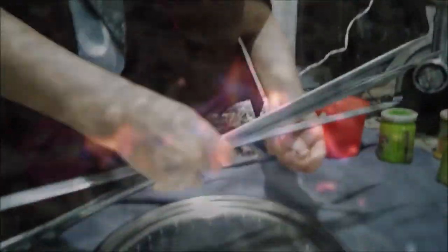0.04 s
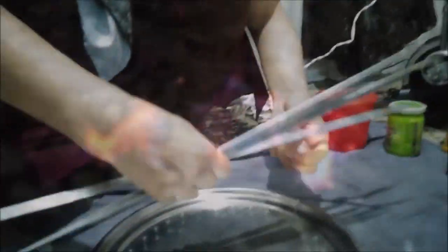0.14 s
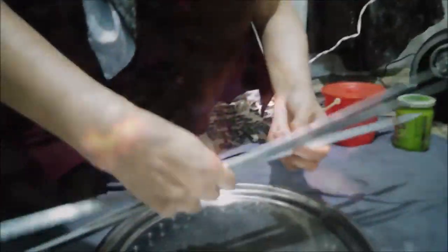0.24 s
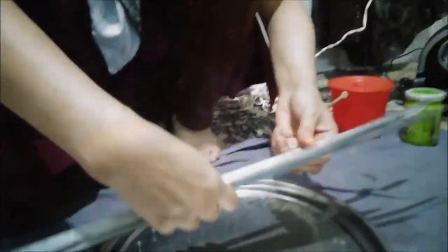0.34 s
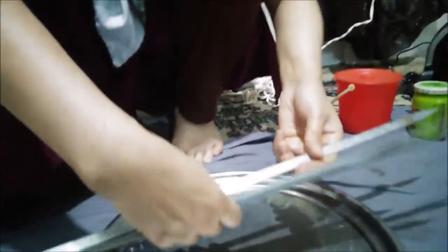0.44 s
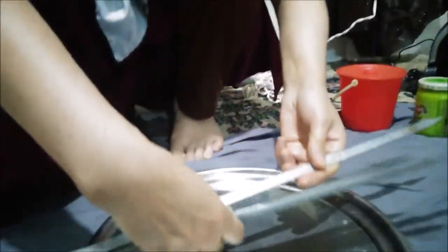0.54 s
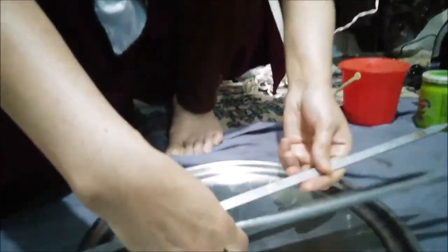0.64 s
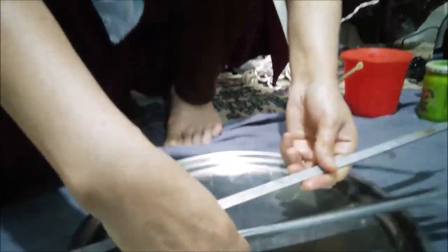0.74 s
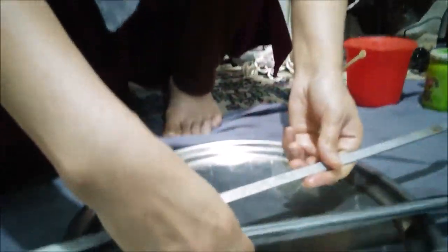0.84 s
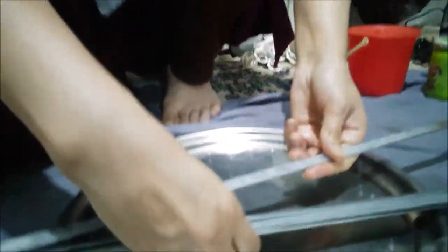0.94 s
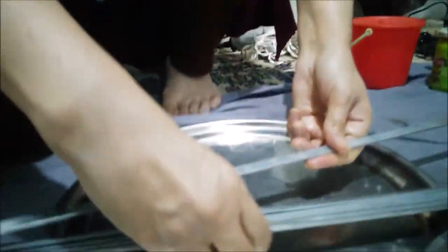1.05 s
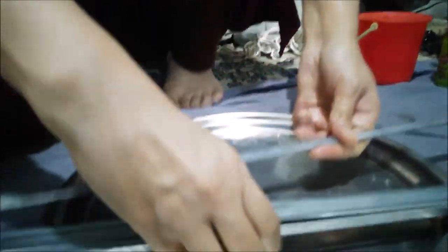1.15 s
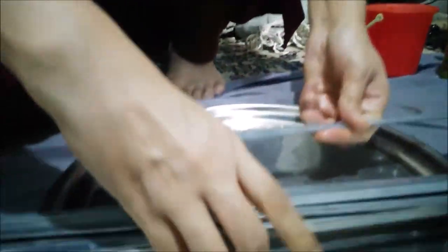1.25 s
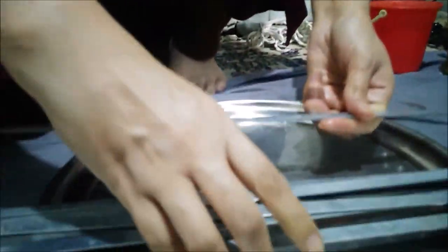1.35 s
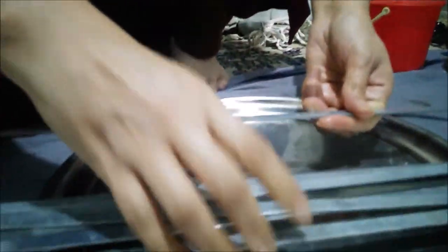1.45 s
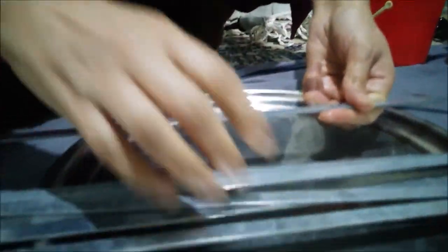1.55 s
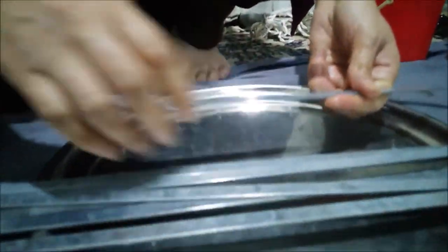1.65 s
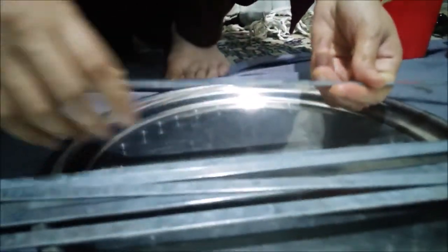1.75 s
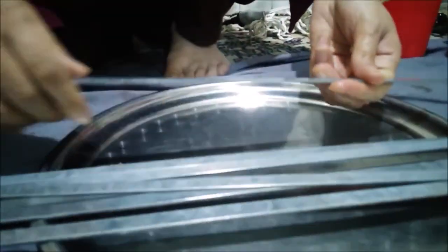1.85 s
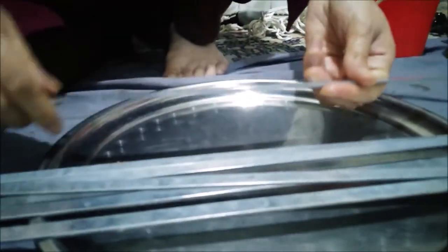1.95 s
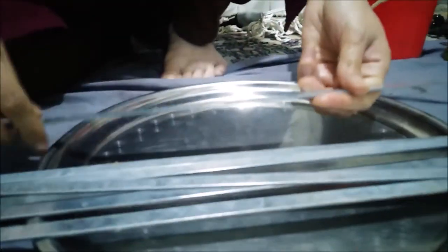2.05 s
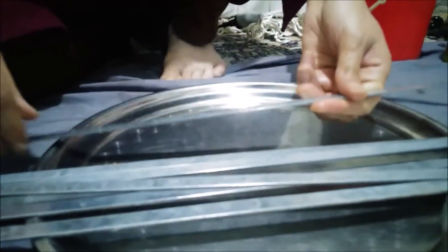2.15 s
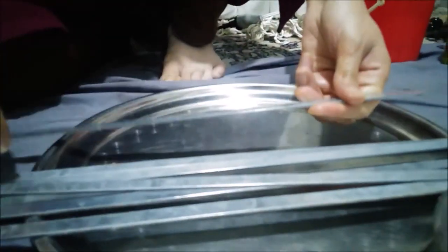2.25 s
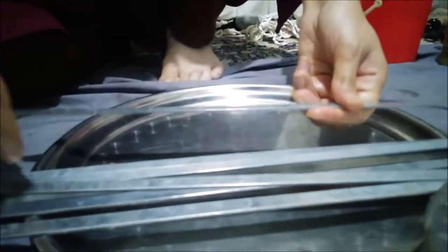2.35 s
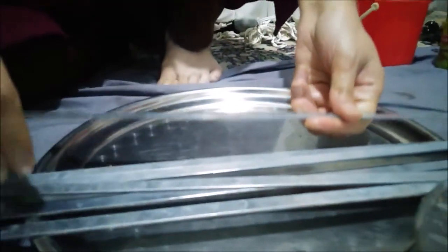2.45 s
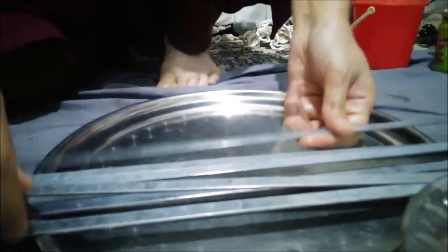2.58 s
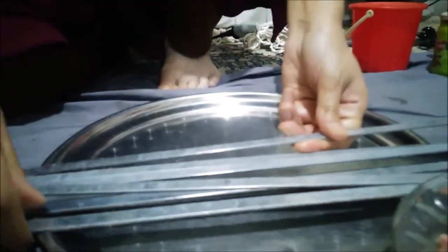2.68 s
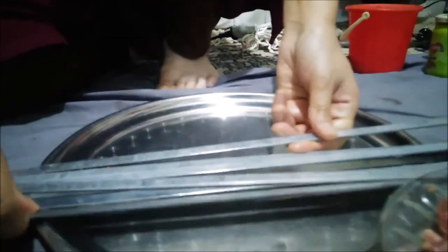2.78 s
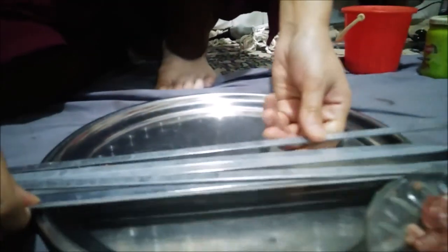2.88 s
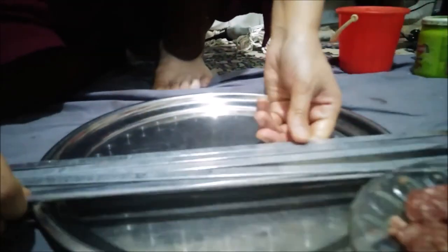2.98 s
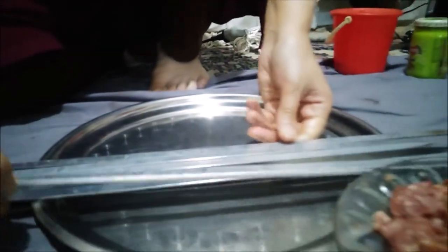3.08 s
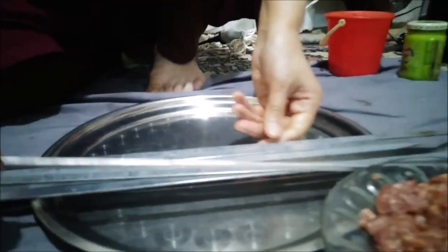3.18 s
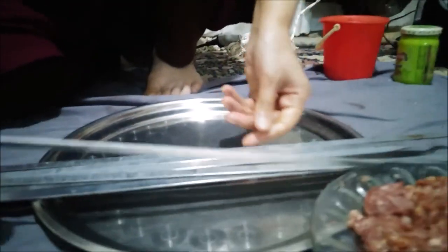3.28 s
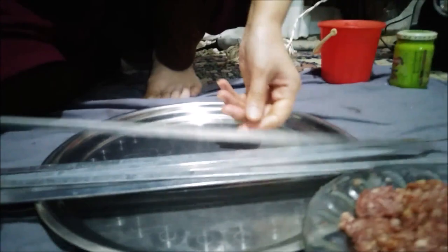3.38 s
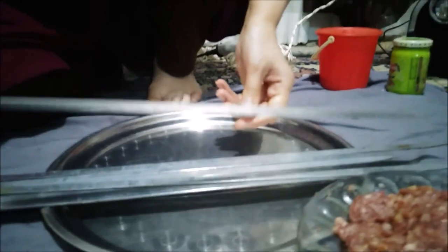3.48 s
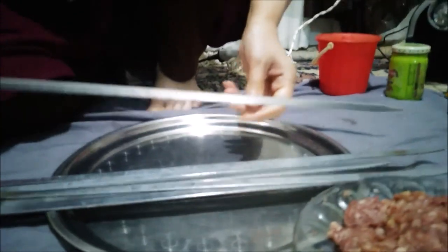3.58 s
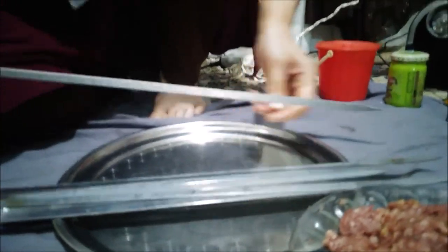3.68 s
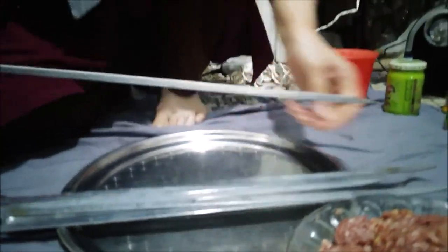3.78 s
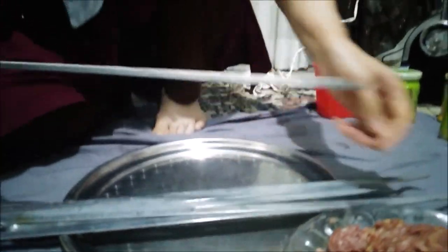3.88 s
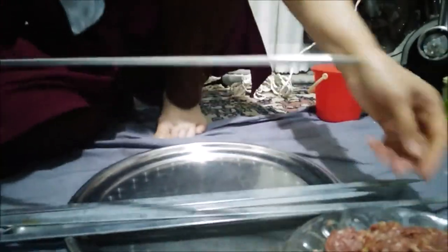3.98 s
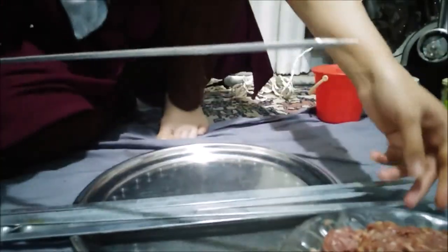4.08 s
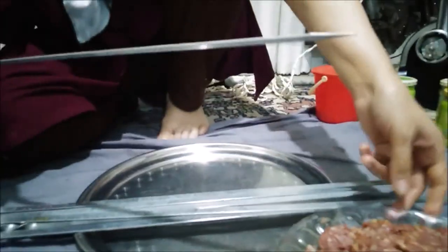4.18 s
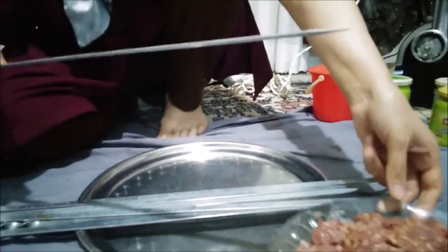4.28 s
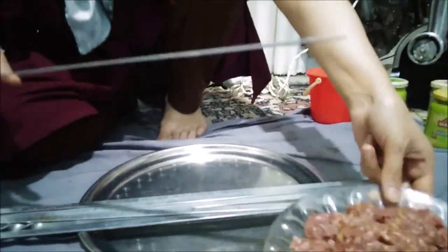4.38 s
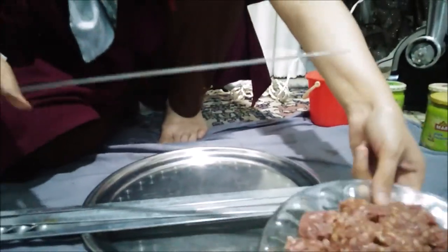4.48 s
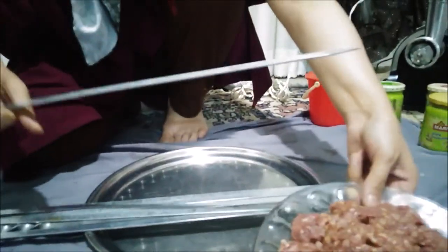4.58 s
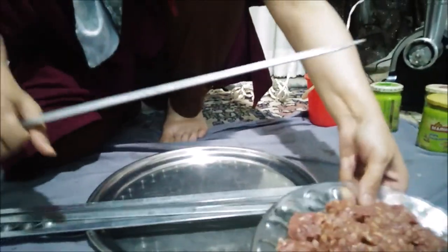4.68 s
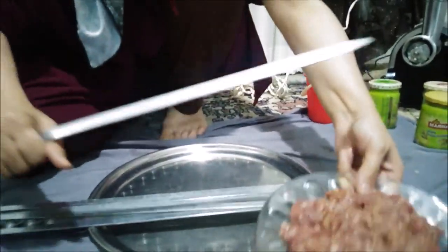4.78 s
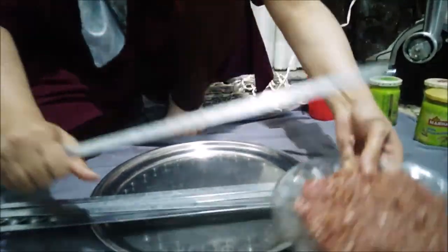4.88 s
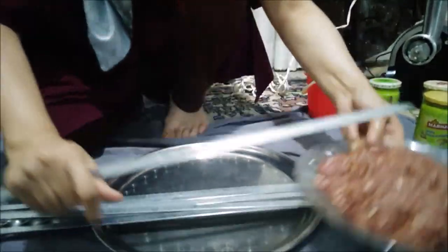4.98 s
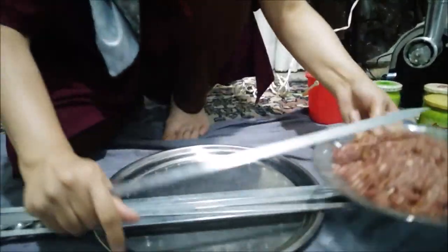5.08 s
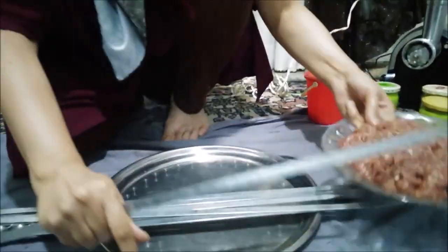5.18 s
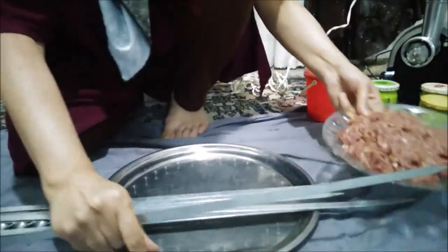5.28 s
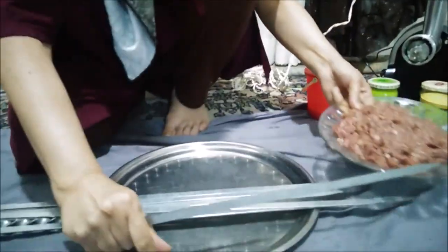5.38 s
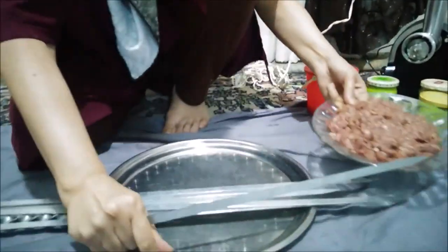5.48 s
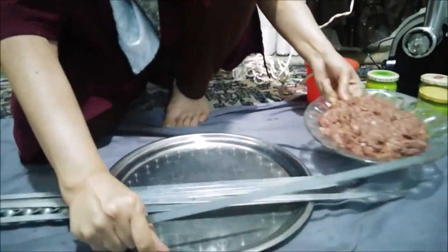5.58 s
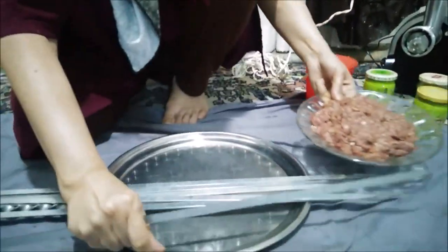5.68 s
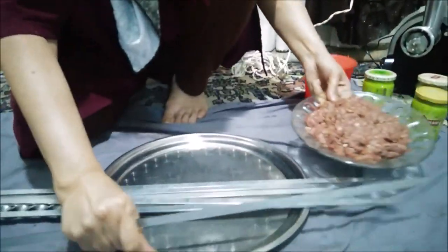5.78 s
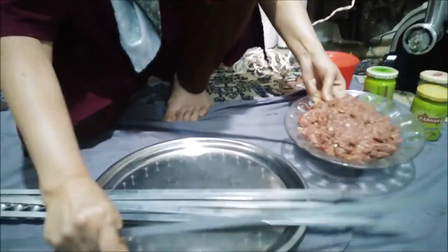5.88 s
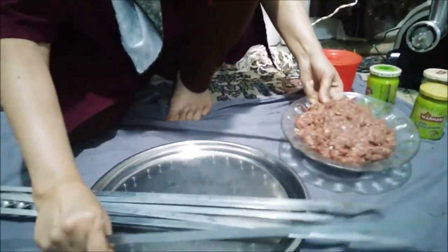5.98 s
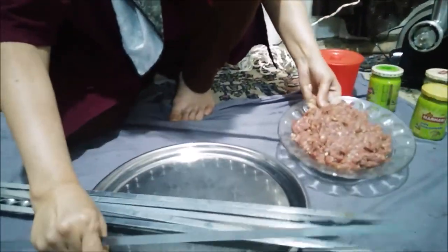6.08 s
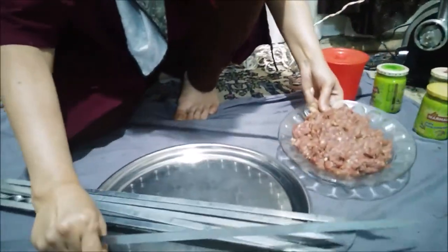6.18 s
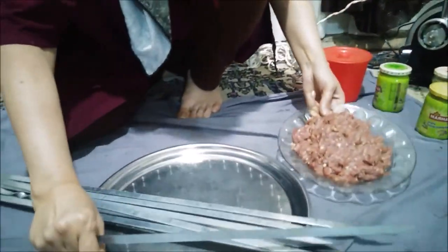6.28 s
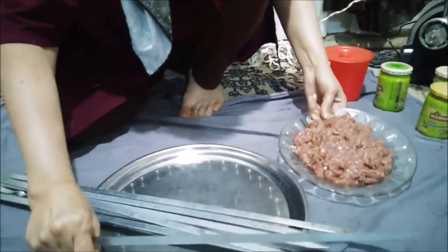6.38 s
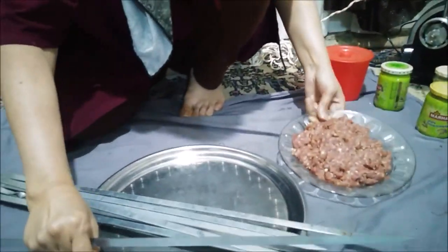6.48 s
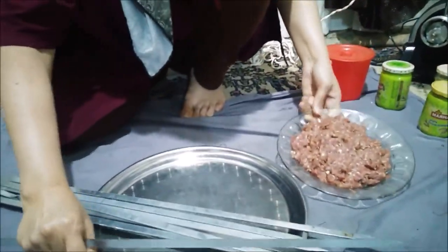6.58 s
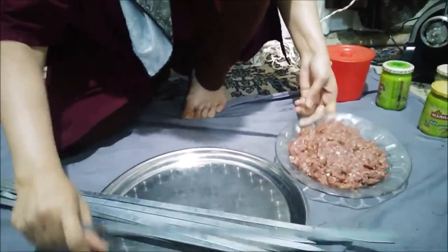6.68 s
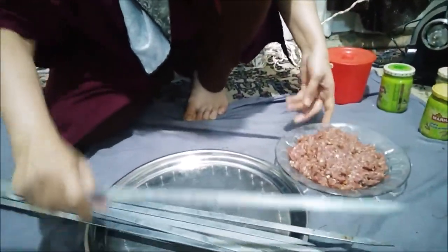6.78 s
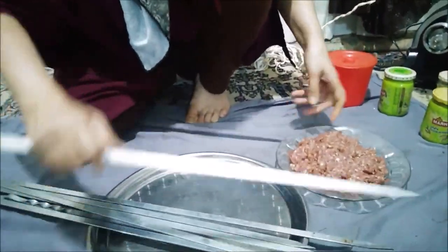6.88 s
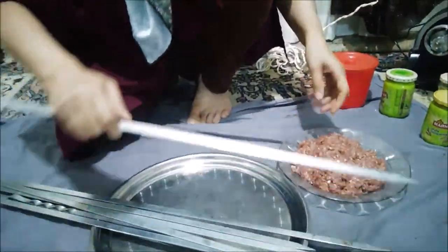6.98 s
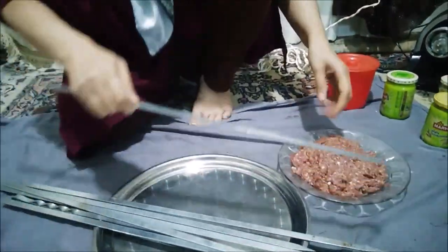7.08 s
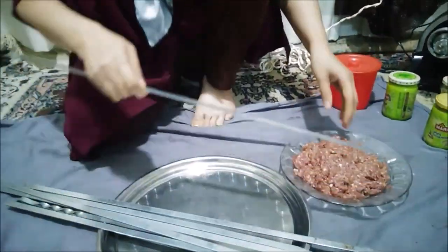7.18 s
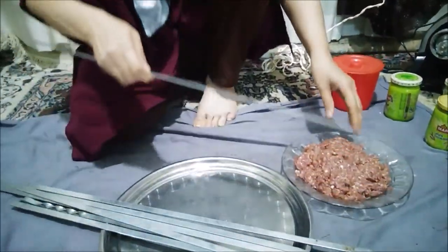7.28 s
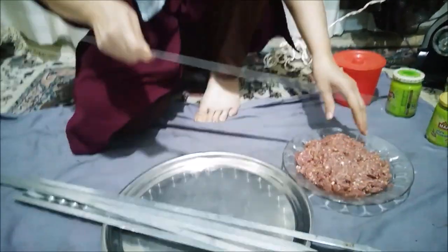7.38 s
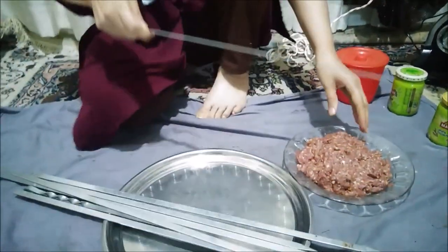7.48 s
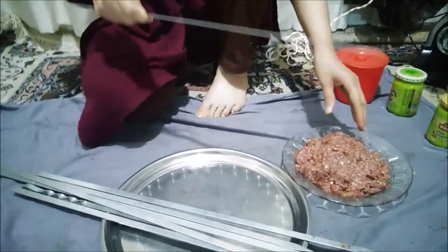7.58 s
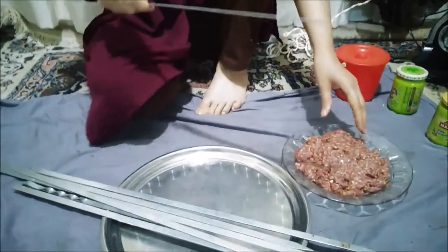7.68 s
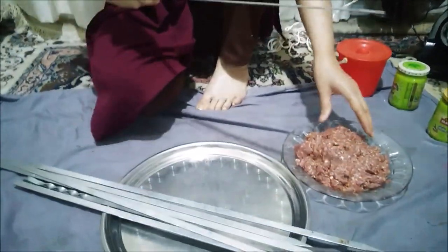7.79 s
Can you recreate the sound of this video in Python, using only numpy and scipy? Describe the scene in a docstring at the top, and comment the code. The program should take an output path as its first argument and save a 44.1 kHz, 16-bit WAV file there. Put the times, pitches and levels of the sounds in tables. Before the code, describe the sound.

A close, slightly compressed phone pickup in a small, soft room, with a low mains hum, wavering drone, rumble, faint whirring and thin hiss underneath. From 0.2 to 0.8 seconds, steel skewers give small, bright, short taps. At 0.85 they begin knocking harder, and from about 1.25 to 1.7 they clash and rattle loudly, a dense, jangling metallic scrape that thins away by 2.2. At 2.7 another sharp clash starts a run of knocks and slides, lasting until about 3.6. Then it is nearly quiet, with a faint tink near 4, light touches at 4.4 and a clearer tink at 4.85. At 5.36 a glass bowl lands with a hard, bright clink and a quick second knock, then softer chatter around 5.6. Muted steel taps and slight scrapes occur from 6.2 to 6.9. One dry snap, mostly left, comes at 7.2, before the low background closes the scene.

```python
"""Close up on a phone: a mains hum, a wavering drone, rumble, faint whirring bands and hiss lie under it all.
Long flat steel skewers tap softly, then from 0.85 s are knocked, rattled and slid on a steel tray: damped sines.
Past 3.6 s they quieten, with two faint tinks; from 5.4 s a glass bowl is set down with a few clinks, then softer
knocks follow, and at 7.2 s one dry snap, mostly on the left. A small soft room, made of decaying noise, answers."""
import sys
import numpy as np
from scipy import signal
from scipy.fft import rfft, irfft, next_fast_len
from scipy.io import wavfile
from scipy.ndimage import uniform_filter1d

SR = 44100
rng = np.random.default_rng(int(sys.argv[2]) if len(sys.argv) > 2 else 0)


def write(x):
    x = np.atleast_2d(x).T
    wavfile.write(sys.argv[1], SR, np.round(np.clip(x, -1, 1) * 32767).astype(np.int16))


N = 345786

# All levels are set at the microphone, ahead of its noise suppressor and limiter.
# The air of the place. Each row: time in seconds, drone level in dB, rumble level in dB.
AIR_LEVELS = [(0.0, -61, -59.5), (0.24, -61, -57), (0.61, -69.5, -60), (0.89, -57, -50.5),
              (1.18, -56, -53.5), (1.24, -60, -39.5), (2.01, -58, -55), (2.66, -55.5, -53.5),
              (2.68, -58, -43), (3.34, -64, -52), (3.41, -51.5, -48.5), (3.82, -59, -56),
              (4.08, -50, -55.5), (4.82, -60, -61.5), (5.43, -47.5, -60), (5.65, -58.5, -63),
              (7.6, -70, -59), (7.84, -75, -55.5)]
# Level of the whirring bands. Each row: time in seconds, level in dB.
WHIRR_LEVELS = [(0, -71), (.4, -66), (.8, -66.5), (1.85, -70.5), (2.2, -67), (2.5, -78), (3.9, -71),
                (4.3, -65.5), (4.65, -70), (5.2, -65.5), (6.2, -62.5), (7.0, -71), (7.45, -70), (7.84, -64)]
# Thin hiss. Each row: frequency in Hz, relative density in dB per Hz.
HISS_DENSITY = [(450, -4), (700, -10.5), (1000, -12.5), (1700, -13), (2500, -12), (4000, -14.5),
                (7000, -10), (10000, -18), (13500, -17.5)]
# Noise resonances: rumble, whirr, and the lowest boom. Each row: centre in Hz, width in Hz, relative level in dB.
RUMBLE_BANDS = [(187.4, 62, 3.5), (260, 69, -5), (340.2, 92, -3), (467.5, 330, -23)]
WHIRR_BANDS = [(600, 140, -6.5), (1230, 130, -5.5), (1455.6, 130, 2.5), (1900, 80, -13)]
BOOM_BANDS = [(35, 32, -11.5), (81, 30, 2)]
# Decay of the small room. Each row: frequency in Hz, time to fall 60 dB in seconds.
ROOM_DECAY = [(300, 0.83), (2000, 0.47), (7000, 0.35), (14000, 0.2)]
# Balance of the two microphone ports. Each row: frequency in Hz, left minus right in dB.
PORT_BALANCE = [(60, 2.5), (110, 2.0), (200, 1.5), (380, 2.5), (700, -1.5), (1290, 7.5), (2380, -5.5),
                (4400, -4.5), (8120, 3.5), (15000, 4.5)]
# Faint tinks of a free skewer. Each row: start in seconds, level in dB, pitch factor, left minus right in dB.
TINK_EVENTS = [(3.96, -68.5, 0.87, 1.5), (4.854, -54.5, 0.98, -2.5)]
# Modes of the free skewer. Each row: frequency in Hz before the pitch factor, relative level in dB,
# time to fall 60 dB in seconds before damping.
TINK_MODES = [(2100, -7, 0.1), (3366, -11, 0.057), (4270, 1.5, 0.071), (5520, 2, 0.092),
              (6650, -0.5, 0.094), (7980, -5, 0.072)]
# Bowl clinks. Each row: start in seconds, level in dB, left minus right in dB, damping time to fall 60 dB in
# seconds, brightness in dB per octave, crack level in dB relative to the ring.
CLINK_EVENTS = [(5.359, -6.5, -2, 0.073, -2.5, -8), (5.434, -17.5, 1.5, 0.053, -2.5, 1.5),
                (5.581, -35, -1, 0.2, 8, -22), (5.6, -34, -7, 0.17, 3, -21),
                (5.618, -31.5, 6, 0.14, -1, -12), (5.652, -28.5, 1, 0.12, 0, -13),
                (5.666, -29, 15, 0.051, 1.5, -24), (5.677, -24.5, -4, 0.095, 3, -14)]
# Modes of the glass bowl. Each row: frequency in Hz, relative level in dB, time to fall 60 dB in seconds
# before damping.
BOWL_MODES = [(614, -2, 0.25), (694, -12, 0.1), (783, -22, 0.1), (934, -13, 0.054), (1120, -17, .05),
              (1406, -1.5, 0.029), (1890, -16, .05), (2344, -1, 0.045), (2510, 0.5, 0.069),
              (3424, -5, 0.065), (4370, -6, 0.063), (4580, -1, 0.055), (4880, -13.5, 0.054),
              (5400, -1.5, 0.092), (5850, 1, 0.049), (6370, -4.5, .07), (6683, 8, 0.053), (6950, -5, 0.074),
              (7850, -15.5, .08), (7980, -6.5, 0.26), (9000, -35, .06)]
# Rebounds of the bowl. Each row: typical gap after the knock in seconds, relative level in dB.
BOWL_REBOUNDS = [(.004, -4), (.016, -13), (.03, -19)]
# Strongest modes of the steel strips. Each row: frequency in Hz, relative level in dB, time to fall 60 dB in
# seconds before damping.
STRONG_MODES = [(1540, -23, 1.1), (1620, -5.5, .6), (1866, -1.5, 1.8), (1910, -5, 3), (3420, -27, 0.33),
                (3670, -4.5, 0.41), (4320, -14, 0.2), (5040, -30.5, 0.23), (5920, -1, 0.31),
                (5930, 0.5, 0.27), (5870, -1.5, 0.2), (6280, -10.5, 0.52), (7740, -8, 0.42),
                (6145, 2.5, 1.1), (7120, -6.5, 1.1), (6700, 5, 0.35), (7675, -9, 0.35), (7370, -16, 0.48),
                (7750, -17.5, 1.1), (6670, -14.5, 0.33), (8170, -1.5, 0.43), (9450, -17.5, 0.64),
                (9119, -21, 0.62), (8720, -9.5, 0.17), (9663, -20.5, 0.33), (10700, -21.5, 0.34),
                (11160, -27, 0.55), (11700, -24, 0.35)]
# Loudness contour of the dense strip modes. Each row: frequency in Hz, relative level in dB.
DENSE_CONTOUR = [(150, -56), (400, -28), (620, -18), (1030, -22), (1650, -3.5), (1890, -3.5), (2800, -14),
                 (3620, -5), (4010, -16.5), (5000, -13.5), (6900, -3.5), (9220, -11.5), (10400, -19),
                 (13600, -21), (14600, -33)]
# Slides and rattles. Each row: loudest from in seconds, rise, hold and fall in seconds, edge level in dB,
# bending level in dB relative to edge, tray level in dB relative to edge, left minus right in dB.
SLIDE_EVENTS = [(0.0, 0.009, .02, 0.63, -74.5, -19, 9, -7), (0.341, 0.23, .01, 0.25, -54, -16, -23, 0),
                (0.48, 0.12, .01, 0.15, -51.5, -14, -23.5, 1),
                (0.76, 0.14, 0.11, 0.067, -59.5, -24, -27, -11),
                (0.989, .012, .11, .3, -29, -2.5, -20.5, 0.64),
                (1.23, .12, 0.0058, 0.038, -21, -2, -12, -1),
                (1.293, 0.081, 0.094, 0.33, -11.5, -8, -24.5, -1),
                (1.386, .15, 0.055, 0.22, -13, -3.5, -17, -2), (1.531, .08, .06, .15, -23.5, -5, -21, -0.5),
                (1.9, 0.56, .01, .4, -64, -22, -12.5, .5), (2.089, .2, 0.011, 0.47, -74, 8.5, -16, -5),
                (2.773, .01, 0.085, 0.17, -23, -6, -16, -0.5),
                (2.96, .05, 0.071, .05, -28, -1.5, -15, -0.5),
                (3.038, .01, 0.038, 0.2, -19, -4.5, -18.5, -1),
                (3.137, .1, 0.044, 0.066, -34, -2.5, -14.5, 1),
                (3.342, 0.0064, 0.052, .1, -33.5, -0.5, -10, 2),
                (3.395, 0.043, 0.02, 0.14, -20, -8, -17.5, 1.5), (3.54, 0.3, 0.02, 0.23, -39.5, 2.3, -6, 0),
                (3.953, .02, 0.014, 0.16, -75.5, 12.5, -10, 4.5),
                (4.305, 0.14, 0.084, .03, -69.5, 0, -9, -1), (4.411, .01, 0.012, 0.056, -58, 16, 3.5, 3),
                (5.404, 0.19, .01, 0.33, -51.5, -18, -11, -1), (5.56, .06, 0.041, .3, -61.5, 3, -21, -2.5),
                (5.661, .2, 0.011, 0.1, -53, 6.5, -4.5, 7), (5.818, 0.074, 0.05, 0.21, -46, 5, -11, 3.5),
                (6.167, 0.078, 0.079, 0.46, -65.5, 12, -14.5, 8.5),
                (6.371, 0.19, 0.074, .2, -61.5, -3, -15, 3.5), (6.553, 0.19, 0.046, 0.086, -61, 8, -10, 7),
                (6.634, 0.12, 0.0089, 0.14, -45, -9, -14, 0), (6.8, 0.17, 0.0086, 0.16, -47.5, 0, -13, 2.5),
                (6.951, .1, 0.12, 0.36, -71, 3.5, -9.5, 5.5),
                (7.24, .03, 0.066, 0.19, -70.5, 1.5, -4.5, 9.5),
                (7.54, 0.37, 0.0094, .25, -63, -5.5, -2.5, -4.5), (7.5, .2, 0.22, .2, -85, 7, 15, 3.5)]
# The held bundle is never quite still: mean levels in dB of its edge, bending and tray modes.
FIDGET_LEVELS = (-77, -84, -85.5)
# Skewer knocks. Each row: start in seconds, edge level in dB, bending level in dB relative to edge,
# tray level in dB relative to edge, damping time to fall 60 dB in seconds, left minus right in dB.
KNOCK_EVENTS = [(0.2274, -33.5, -35, -33, 0.16, 9), (0.2644, -20, -17, -41, 0.045, 2.5),
                (0.317, -28.5, -26, -40, 0.073, 0), (0.4573, -25, -29, -80, 0.027, 0),
                (0.695, -45, -30, -38, 0.17, -7), (0.761, -44, -25, -27, 0.048, -1),
                (0.7884, -45, -29, -30, 0.062, 5), (0.852, -8.5, -5, -13, 0.1, 1.5),
                (0.9707, -16, 5.5, -8.5, 0.04, 5), (0.9833, -9.5, -4.5, -17.5, 0.093, 4),
                (1.0257, -13.5, -1.5, -8.5, 0.33, 0.5), (1.1578, -15.5, -4.5, -17.5, 0.21, 5),
                (1.2273, -12, -7.5, -29, 0.031, 11.5), (1.2583, 12, -5.5, -16, 0.042, -1),
                (1.5034, 8, -8.5, -31, 0.086, -1), (1.5999, -12, 1.5, -20, 0.092, -1.5),
                (1.6737, -24, -7, -17, 0.09, -5), (1.711, -22.5, -8, -18, 0.017, -8),
                (1.8125, -23, -3, -17, 0.092, -2), (1.909, -53, -5.5, -2, 0.12, -7.5),
                (1.9892, -33.5, 2, -22, 0.14, 1.5), (2.1312, -44, -3, -13, 0.28, -10),
                (2.163, -32.5, -1, -27, 0.15, 2), (2.6852, 4.5, -6.5, -19, 0.16, -2.5),
                (2.7278, -5, -9.5, -30, 1, 2.5), (2.7842, -3, -5.5, -19.5, 0.22, -3.5),
                (2.8176, -5, -8, -26, 0.19, 0.5), (2.9481, -21.5, 0.5, -11, 0.53, -1),
                (3.0328, -5.5, -0.5, -13, 0.038, -2.5), (3.0793, -10.5, -6, -32, 0.079, -3),
                (3.3327, -17, -7, -17, 0.4, -1.5), (3.4925, -10.5, -4.5, -17.5, 0.086, 2.5),
                (3.5569, -21.5, -8, -24, 0.11, 6), (4.4172, -30.5, -3.5, -21, 0.28, 5.5),
                (4.4692, -39, 2, -10.5, 0.26, 0), (5.8234, -47, 4, -7.5, 0.16, 9),
                (6.248, -22.5, -14, -42.5, 0.16, 2.5), (6.4333, -56, 8, -20.5, 0.13, 3.5),
                (6.5634, -45.5, 9, -14, 0.28, 1), (6.6008, -22, -6, -34, 0.17, 3),
                (6.6727, -35, 1.5, -20.5, 0.19, 4), (6.761, -41.5, 2.5, -29.5, 0.13, 18.5),
                (6.7792, -34.5, 0.5, -26, 0.089, -5), (6.8952, -39.5, -2, -33, 0.34, 4)]

HUM_HZ, HUM_DB, HUM_WAVER_DB, DRONE_HZ = 100.8, -56, 2.5, 144.5
HISS_DB, ROOM_DB = -72, -10
SNAP_S, SNAP_DB, SNAP_PAN_DB = 7.2065, -27.5, 17
TRAY_TOP_HZ, BENDING_TOP_HZ = 1200, 4000  # tray modes lie below, edge modes above
PORT_LAG_S = 0.00033
CLINK_SCATTER_DB = 2.5
CONTACTS_PER_S, TICK_WANDER_DB, TICK_TOP = 900, 2, 4  # the top caps rare strong contacts
SLIDE_FADE_DB, FIDGET_WANDER_DB = 30, 3  # the fade is gained per rise time and lost per fall time
GATE_DB, GATE_DEPTH_DB, LIMIT_DB = -86, -8, -10
MIC_TOP_HZ, TOP_HZ = 14300, 15600
LEFT_RIGHT = np.array([[1], [-1]])


def undb(db):
    """dB to gain."""
    return 10 ** (np.asarray(db) / 20)


def unit(x):
    """Scale to rms 1."""
    return x / np.sqrt(np.mean(x ** 2) + 1e-30)


def on_log(table, hz):
    """Read a table of frequency and value on a log-frequency axis."""
    f, v = np.transpose(table)
    return np.interp(np.log(np.maximum(hz, 1)), np.log(np.maximum(f, 1)), v)


def curves(table):
    """Columns of a time table, one value a sample."""
    s, *columns = np.transpose(table)
    return [np.interp(np.arange(N) / SR, s, c) for c in columns]


def walk(rate):
    """Random levels held for 1 / rate seconds and smoothed twice, scaled to rms 1."""
    hold = int(SR / rate)
    steps = np.repeat(rng.standard_normal(N // hold + 1), hold)
    return unit(uniform_filter1d(uniform_filter1d(steps, hold), hold)[:N])


def decay(t, t60):
    """Exponential fall of 60 dB in t60 seconds."""
    return np.exp(-np.log(1000) * t / t60)


def mode_gain(db):
    """Mode levels in dB as a column of gains."""
    return undb(db)[:, None].astype(np.float32)


def bands(modes, alike, flicker_db):
    """Noise in resonances that each flicker; partly alike left and right."""
    size = next_fast_len(N, True)
    f = np.arange(size // 2 + 1) * SR / size
    out = 0
    for hz, width, db in modes:
        shape = 1 / (1 + ((f - hz) / (width / 2)) ** 4)
        mid, side = (unit(irfft(rfft(rng.standard_normal(size)) * shape, size)[:N]) for _ in range(2))
        pair = np.sqrt((1 + alike) / 2) * mid + np.sqrt((1 - alike) / 2) * side * LEFT_RIGHT
        out = out + undb(db + flicker_db * walk(13)) * pair
    return unit(out)


def rings(hz, t60, spread):
    """Damped sines at both ports: long waves reach the left port later, and each mode radiates its own way."""
    t = np.arange(SR // 3) / SR
    lag = np.where(hz < BENDING_TOP_HZ, 2 * np.pi * hz * PORT_LAG_S, 0)
    lag = lag + spread * rng.standard_normal(len(hz))  # radians
    pole = 2j * np.pi * hz - np.log(1000) / t60
    wave = np.exp(np.outer(pole, t).astype(np.complex64))
    side = undb(on_log(PORT_BALANCE, hz) / 2)
    port_gains = (side * np.exp(-1j * lag), 1 / side)
    return np.array([(wave * g[:, None].astype(np.complex64)).imag for g in port_gains])


def strike(ring, t60, scatter_db, rise_s):
    """A new contact point weights the modes afresh; added damping shortens the ring."""
    chance = rng.standard_normal((2, ring.shape[1]))
    t = np.arange(ring.shape[2]) / SR
    weights = (np.sign(chance[0]) * undb(scatter_db * chance[1])).astype(np.float32)
    return weights @ ring * decay(t, max(t60, .01)) * (1 - np.exp(-t / rise_s))


def add(out, sound, s, db, pan_db):
    """Place a sound at s seconds with its peak at db before panning."""
    i = int(s * SR)
    n = min(sound.shape[1], N - i)
    out[:, i:i + n] += sound[:, :n] * undb(db + pan_db * LEFT_RIGHT / 2) / np.abs(sound).max()


def hum():
    """A mains hum: a sine wavering in pitch and level, inside a narrow band of noise."""
    phase = 2 * np.pi * np.cumsum(HUM_HZ + 0.67 * walk(13)) / SR
    level = undb(HUM_DB + HUM_WAVER_DB * walk(23) + .9 * LEFT_RIGHT)
    return np.sqrt(2) * np.sin(phase) * level + undb(-57) * bands([(105.55, 59, 0)], 0.88, 1.1)


def drone(level_db):
    """A sine that comes and goes, its pitch and level wandering, slightly out of phase between ports."""
    level = undb(level_db + .8 * LEFT_RIGHT) * undb(2.8 * walk(6.6))
    phase = 2 * np.pi * np.cumsum(DRONE_HZ + 4 * walk(6)) / SR - .15 * LEFT_RIGHT
    return level * np.sqrt(2) * np.sin(phase)


def hiss():
    """Thin hiss: third-octave-spaced noise bands, nearly independent at the two ports."""
    centres = 500 * 2 ** np.arange(0, 4.8, 1 / 3)
    # A band's power grows with its width, hence with its centre frequency.
    modes = [(f, f / 4, on_log(HISS_DENSITY, f) + 10 * np.log10(f)) for f in centres]
    return undb(HISS_DB) * bands(modes, 0.089, 3.3)


def background():
    """The place itself: steady hum, changing drone, rumble and whirr, low boom and hiss."""
    drone_db, rumble_db = curves(AIR_LEVELS)
    whirr_db, = curves(WHIRR_LEVELS)
    rumble = undb(rumble_db + .9 * LEFT_RIGHT) * bands(RUMBLE_BANDS, 0.89, 2.6)
    boom = undb(-71) * bands(BOOM_BANDS, 0.25, 2)
    whirr = undb(whirr_db) * bands(WHIRR_BANDS, 0.16, 3)
    return hum() + drone(drone_db) + rumble + boom + whirr + hiss()


def room(dry):
    """Diffuse echoes, other ones at each port, dying faster in the treble."""
    f, t, spec = signal.stft(rng.standard_normal((2, SR * 3 // 4)), SR, nperseg=256)
    spec = spec * decay(t, on_log(ROOM_DECAY, f)[:, None])
    tail = signal.istft(spec, SR, nperseg=256)[1]
    tail = tail * np.clip(np.arange(tail.shape[1]) / SR / 0.008, 0, 1)  # echoes build up over 8 ms
    tail = tail / np.sqrt(np.sum(tail ** 2, axis=1, keepdims=True))
    return undb(ROOM_DB) * signal.fftconvolve(dry, tail, axes=1)[:, :N]


def snap():
    """One dry snap: a sharp edge with a dull thump and a short bright sizzle."""
    out, t = np.zeros((2, N)), np.arange(SR // 20) / SR
    noise = rng.standard_normal((2, 2, len(t)))
    edge = signal.lfilter([1], [1, -.7], noise[0]) * np.exp(-t / 0.0017)
    sizzle_band = signal.butter(2, [5500, 10500], "band", fs=SR, output="sos")
    sizzle = signal.sosfilt(sizzle_band, noise[1]) * np.exp(-t / 0.01)
    thump = -np.sin(2 * np.pi * 700 * t) * np.exp(-t / 0.00073)
    add(out, edge * undb(-5.0) + sizzle * undb(-2) + thump, SNAP_S, SNAP_DB, SNAP_PAN_DB)
    return out


def tinks():
    """A skewer in the air is brushed and rings on a few clean modes."""
    out = np.zeros((2, N))
    hz, db, t60 = np.transpose(TINK_MODES)
    for s, peak_db, pitch, pan_db in TINK_EVENTS:
        ring = rings(hz * pitch, t60, .6) * mode_gain(db)
        add(out, strike(ring, 0.35, 1.5, 0.002), s, peak_db, pan_db)
    return out


def crack(shape, tilt_db):
    """Noise burst of a glass contact, less low-passed when the clink is brighter."""
    t = np.arange(shape[1]) / SR
    pole = np.clip(.6 - 0.058 * tilt_db, 0, .95)
    noise = signal.lfilter([1], [1, -pole], rng.standard_normal(shape))
    high_pass = signal.butter(2, 400, "high", fs=SR, output="sos")
    return signal.sosfilt(high_pass, noise * np.exp(-t / 0.0046))


def bowl():
    """The glass bowl knocks on the tray rim and chatters: short modes, rebounds and a crack."""
    out = np.zeros((2, N))
    hz, db, t60 = np.transpose(BOWL_MODES)
    ring = rings(hz, t60, 0.53)
    for s, peak_db, pan_db, damping, tilt_db, crack_db in CLINK_EVENTS:
        coloured = ring * mode_gain(db + tilt_db * np.log2(hz / 2500))
        sound = strike(coloured, damping, CLINK_SCATTER_DB, 0.0003)
        for gap_s, bounce_db in BOWL_REBOUNDS:
            lag = int(gap_s * SR * rng.uniform(.8, 1.2))
            rebound = strike(coloured, damping, CLINK_SCATTER_DB, 0.00017)
            sound[:, lag:] += undb(bounce_db) * rebound[:, :-lag]
        burst = crack(sound.shape, tilt_db)
        clink = sound / np.abs(sound).max() + undb(crack_db) * burst / np.abs(burst).max()
        add(out, clink, s, peak_db, pan_db)
    return out


def strips():
    """Dense modes of the bundle plus its strongest ones, split into edge, bending and tray groups."""
    dense_hz = 420 + 14080 * np.sort(rng.random(size=800)) ** 1.4
    dense_db = on_log(DENSE_CONTOUR, dense_hz) + 10 * np.log10(dense_hz ** 0.24) - 10
    dense_t60 = 0.35 * undb(2.5 * rng.standard_normal(len(dense_hz)))
    hz, db, t60 = np.transpose(STRONG_MODES)
    hz, db, t60 = np.append(dense_hz, hz), np.append(dense_db, db), np.append(dense_t60, t60)
    ring = rings(hz, t60, 1.0) * mode_gain(db)
    group = np.digitize(hz, (TRAY_TOP_HZ, BENDING_TOP_HZ))
    return [ring[:, group == g] for g in (2, 1, 0)]


def touch_scatter_db(db):
    """Spread of mode strengths in dB: a light touch wakes only a few modes."""
    return 6.0 + 0.1 * np.clip(-28.5 - db, 0, 30)


def slides():
    """Gain of the rattle for each mode group at each port: every slide rises, holds and falls."""
    t = np.arange(N) / SR
    # Doubling the dB turns amplitude into power.
    power = np.array([[undb(2 * (db + FIDGET_WANDER_DB * walk(9.7)))] * 2 for db in FIDGET_LEVELS])
    for s, rise, hold, fall, db, bend_db, tray_db, pan_db in SLIDE_EVENTS:
        i = slice(max(int((s - 2 * rise) * SR), 0), int((s + hold + 2 * fall) * SR))
        fade = np.maximum(np.maximum((s - t[i]) / rise, (t[i] - s - hold) / fall), 0)
        top_db = db + np.array([0, bend_db, tray_db])[:, None] + np.array([pan_db, -pan_db]) / 2
        power[:, :, i] += undb(2 * top_db)[:, :, None] * undb(-2 * SLIDE_FADE_DB * fade)
    return np.sqrt(power)


def contacts():
    """Tiny uneven contacts at random instants, their strength wandering slowly."""
    strength = np.minimum(rng.exponential(size=N), TICK_TOP)
    size = undb(3.0 * strength + TICK_WANDER_DB * walk(40))
    return unit((rng.random(N) < CONTACTS_PER_S / SR) * size)


def rattle(groups):
    """Contacts ring the strips; the contact points wander, so other modes speak every moment."""
    out, hop = np.zeros((2, N + SR)), SR // 12
    gains, ticks = slides(), contacts()
    for a in range(-hop, N, hop):  # overlapping stretches, each with fresh mode weights
        i = np.arange(max(a, 0), min(a + 2 * hop, N))
        fade = np.sin(np.pi * (i - a) / (2 * hop))
        for ring, gain in zip(groups, gains):
            scatter_db = touch_scatter_db(20 * np.log10(gain[:, i].max()))
            body = strike(ring[:, :, :SR // 8], 0.089, scatter_db, 0.00014)
            body = body / np.sqrt(np.sum(body ** 2) / 2)
            sound = signal.fftconvolve(ticks[i] * fade * gain[:, i], body, axes=1)
            out[:, i[0]:i[0] + sound.shape[1]] += sound
    return out[:, :N]


def knocks(groups):
    """Single knocks of steel on steel, rung on all three mode groups; the gripping hand damps them."""
    out = np.zeros((2, N))
    for s, db, bend_db, tray_db, t60, pan_db in KNOCK_EVENTS:
        for ring, rel_db in zip(groups, (0, bend_db, tray_db)):
            add(out, strike(ring, t60, touch_scatter_db(db), 0.0014), s, db + rel_db, pan_db)
    return out


def scene():
    """Steel and glass reach the phone directly and through the room, over the background."""
    groups = strips()
    steel = knocks(groups) + rattle(groups) + tinks()
    glass, dry_snap = bowl(), snap()
    echoes = room(steel + undb(-1.5) * glass + undb(-5.5) * dry_snap)
    return steel + glass + dry_snap + echoes + background()


def suppress(sound):
    """Noise suppressor: turns down every faint time-frequency bin above 450 Hz."""
    f, _, spec = signal.stft(sound, SR, nperseg=1024, noverlap=768)
    power = np.mean(np.abs(spec) ** 2, axis=0)
    power = uniform_filter1d(uniform_filter1d(power, size=3, axis=0), size=3, axis=1)
    bar = undb(2 * GATE_DB) * (f[:, None] > 450)
    keep = power ** 3 / (power ** 3 + bar ** 3 + 1e-60)
    spec = spec * (keep + (1 - keep) * undb(GATE_DEPTH_DB))
    return signal.istft(spec, SR, nperseg=1024, noverlap=768)[1][:, :N]


def limit(sound):
    """Limiter: holds the short-term rms of the clatter, both ports together, under a ceiling."""
    loud = np.sqrt(uniform_filter1d(np.mean(sound ** 2, axis=0), int(0.0014 * SR)) + 1e-12)
    return sound * np.minimum(1, undb(LIMIT_DB) / loud)


def record(dry):
    """The phone suppresses and limits, its microphone fades near the top, peaks clip, a steep filter ends the band."""
    heard = limit(suppress(dry))
    mic_top = signal.butter(10, MIC_TOP_HZ, fs=SR, output="sos")
    heard = np.clip(signal.sosfilt(mic_top, heard), -1, 1)
    band_end = signal.ellip(8, .2, 70, TOP_HZ, fs=SR, output="sos")
    return np.clip(signal.sosfilt(band_end, heard), -1, 1)


dry = scene()
out = record(dry)
write(out)
```